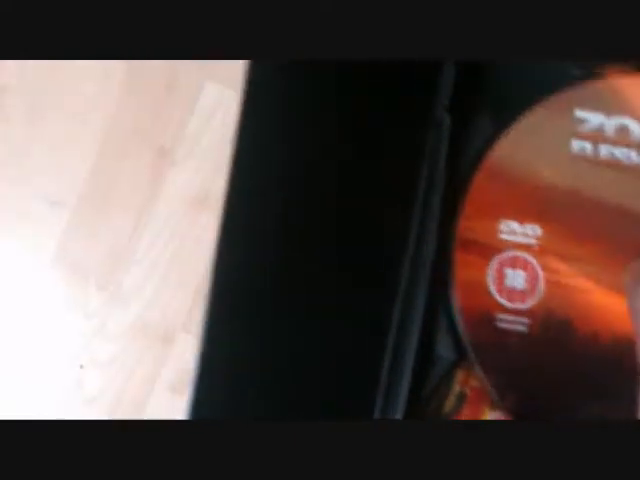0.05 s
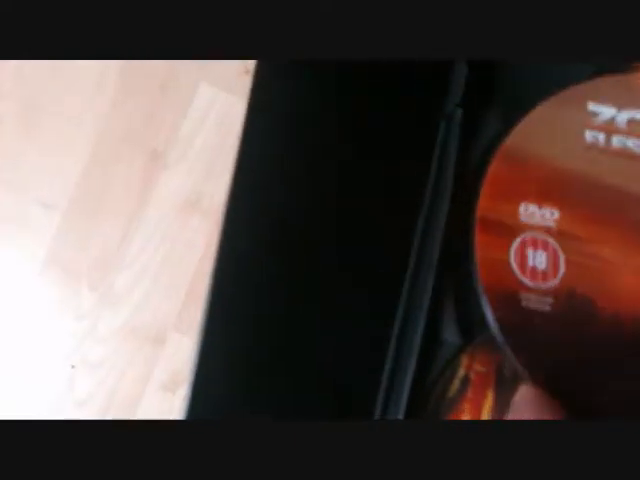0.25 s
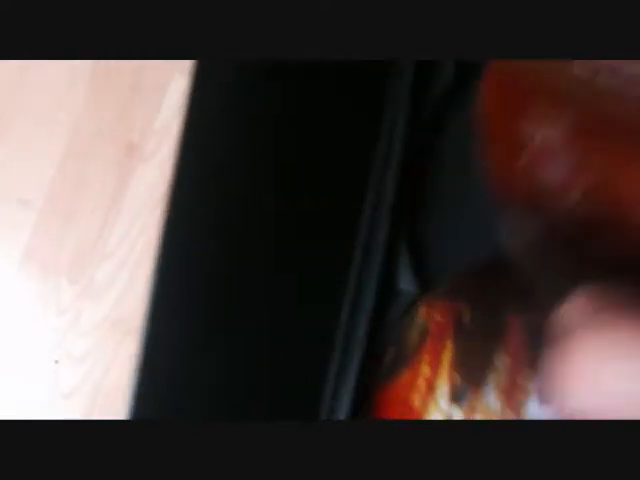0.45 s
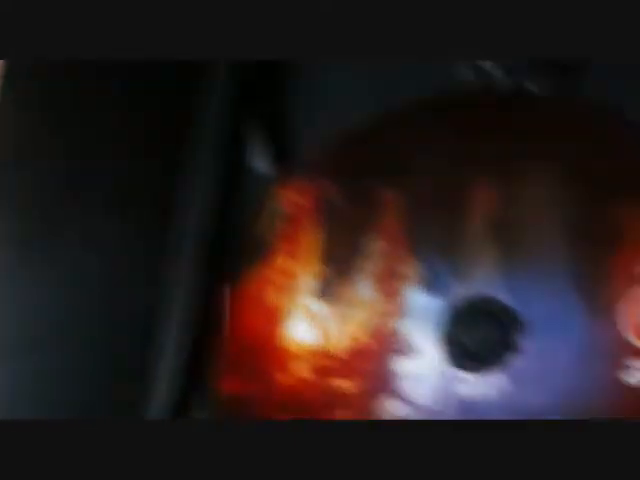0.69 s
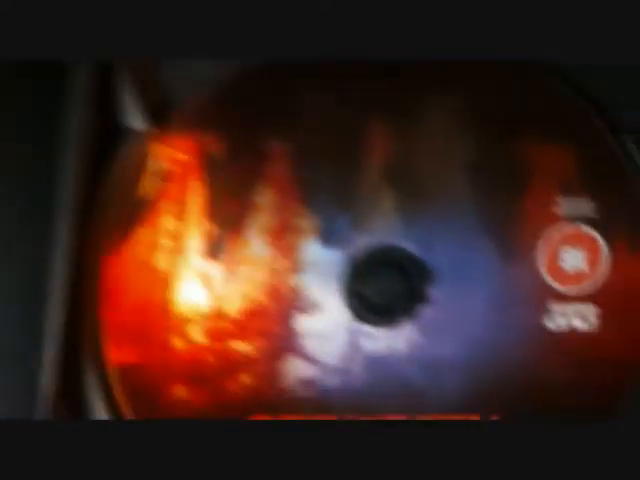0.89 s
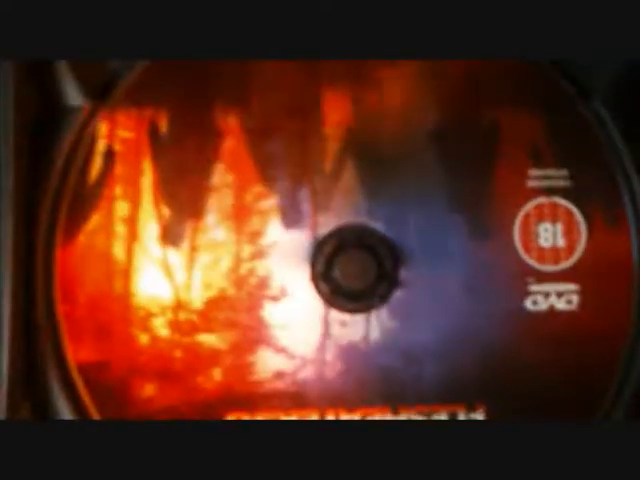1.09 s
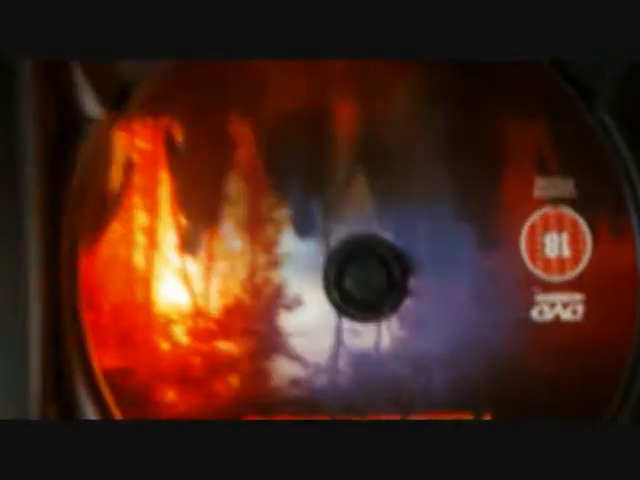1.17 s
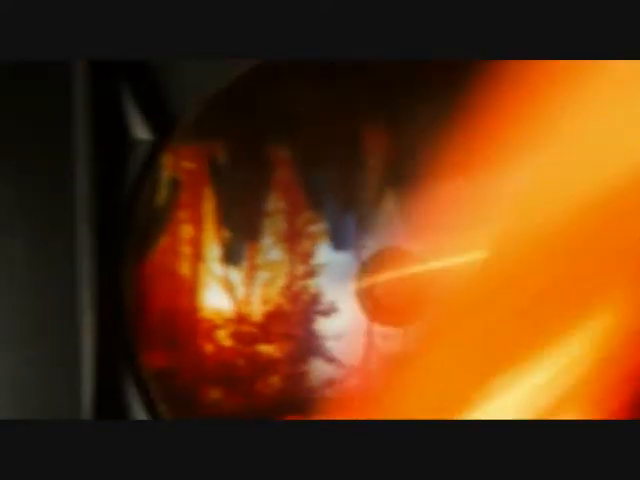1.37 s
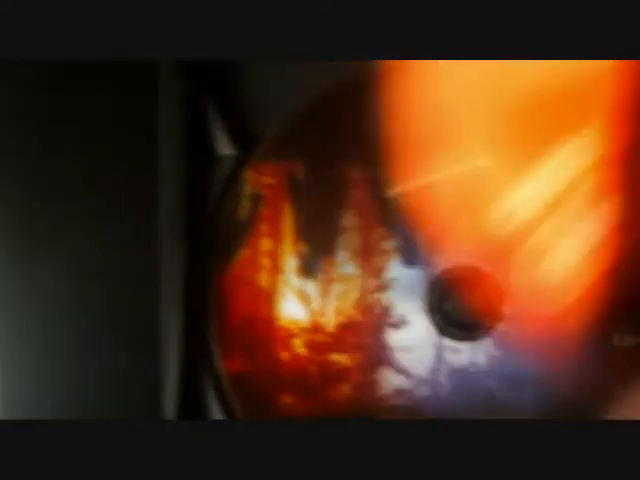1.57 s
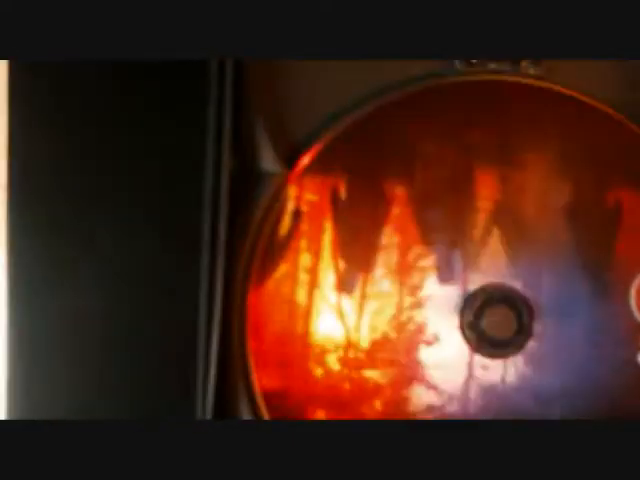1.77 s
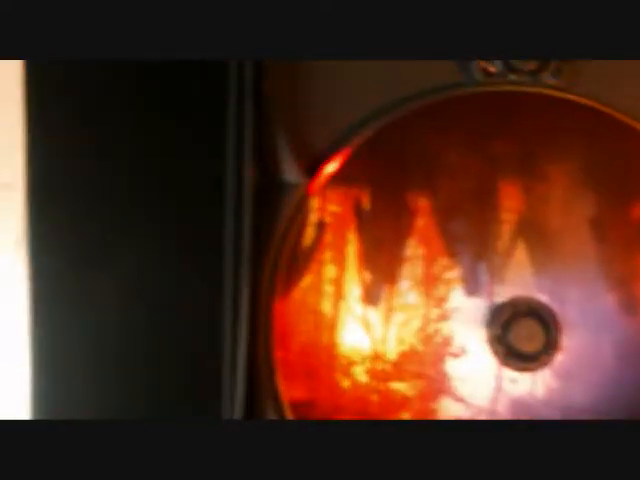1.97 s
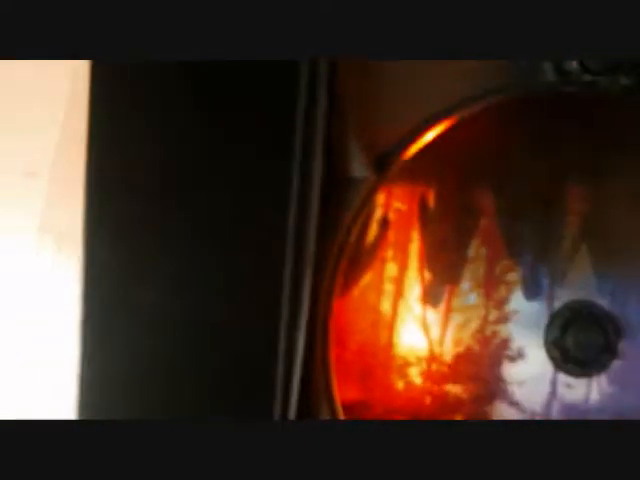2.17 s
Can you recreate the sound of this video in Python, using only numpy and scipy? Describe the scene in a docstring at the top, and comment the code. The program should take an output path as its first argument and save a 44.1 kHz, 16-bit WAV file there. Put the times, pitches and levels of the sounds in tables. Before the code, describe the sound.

A plastic disc snaps off its case hub, then one is pressed on with quick clicks.

```python
"""Discs in a plastic case

Close by in a small quiet room, a disc snaps off its hub in a multi-disc case and the tray claps back.
After some faint sliding, a disc is pressed home in a quick run of snaps. Each snap is a burst of tiny
plastic impacts that sets disc and tray ringing. A coarse recorder cuts off the highest treble and
turns the quiet of the room into a grainy hiss."""
import sys
import numpy as np
from scipy import signal
from scipy.fft import rfft, irfft
from scipy.io import wavfile
from scipy.ndimage import uniform_filter1d, minimum_filter1d

SR = 44100
rng = np.random.default_rng(int(sys.argv[2]) if len(sys.argv) > 2 else 0)


def waveform_to_disk(signal):
    """Save audio, clipped to [-1, 1], as 16-bit WAV at the path in sys.argv[1]."""
    frames = np.transpose(np.atleast_2d(signal))
    scaled = np.clip(frames, -1, 1) * 32767
    samples = np.round(scaled).astype(np.int16)
    wavfile.write(sys.argv[1], SR, samples)


N = 97020
T = np.arange(N) / SR
CUTOFF_HZ = 8800   # top of the recorder's range


def from_db(db):
    """Turn decibels into a volume factor."""
    return 10 ** (np.asarray(db) / 20)


def unit_power(x):
    """Scale a sound to an average power of one."""
    return x / np.sqrt(np.mean(x ** 2) + 1e-20)


def coloured(x, colour, tilt_db=0):
    """Shape a sound's tone with a colour curve, tilted by tilt_db per octave above 1200 Hz."""
    size = 2 * N
    hz = np.maximum(np.arange(N + 1) * SR / size, 1)
    points = np.array(colour)
    curve_db = np.interp(np.log(hz), np.log(points[:, 0]), points[:, 1])
    gain = from_db(curve_db + tilt_db * np.log2(np.clip(hz, 1200, CUTOFF_HZ)))
    gain /= np.sqrt(np.mean(gain[hz < CUTOFF_HZ] ** 2))
    # build the filter so that nothing sounds ahead of a hit
    cepstrum = irfft(np.log(gain))
    cepstrum[1:N] *= 2
    cepstrum[N + 1:] = 0
    return irfft(rfft(x, size) * np.exp(rfft(cepstrum)))[:N]


def grains(per_s, spread_db):
    """Tiny random impacts of uneven size."""
    hits = (rng.random(N) < per_s / SR) * rng.choice([-1, 1], N)
    return unit_power(hits * from_db(spread_db * rng.standard_normal(N)))


def cracks(contacts, colour, fade_s):
    """Plastic chatters on plastic for a moment at each contact, then drops 60 dB in fade_s."""
    out = np.zeros(N)
    for start, db, chatter_s, tilt_db, *_ in contacts:
        shape = (T >= start) * from_db(-60 * np.maximum(T - start - chatter_s, 0) / fade_s)
        burst = shape * grains(per_s=7000, spread_db=4)
        burst *= np.sqrt(np.sum(shape ** 2) / (np.sum(burst ** 2) + 1e-20))
        out += from_db(db) * coloured(burst, colour, np.clip(tilt_db, -5, 5))
    return out


def ringing(snaps, tones, fade_s):
    """Each snap feeds the plastic's own tones. At 2 kHz they drop 60 dB in fade_s, higher ones sooner."""
    out = np.zeros(N)
    for (hz, tone_db), phase in zip(tones, rng.uniform(0, 2 * np.pi, len(tones))):
        kicks = np.zeros(N)
        for start, db, _, _, ring_db in snaps:
            kicks[int(start * SR)] += from_db(db + ring_db + tone_db) ** 2
        tone_fade_s = fade_s * (2000 / hz) ** 0.077
        energy_kept = from_db(-120 / (SR * tone_fade_s))
        energy = signal.lfilter([1], [1, -energy_kept], kicks + 1e-20)
        out += np.sqrt(energy) * np.sin(2 * np.pi * hz * T + phase)
    return out


# tone colour of the quiet room: f/Hz, level/dB
AIR_COLOUR = [(8, 7.5), (28, 19), (60, 16), (150, 12), (400, 9), (1000, 5), (3000, -0.5), (8000, -0.5)]


def room_air():
    """The room's faint, steady noise, strongest in the bass."""
    return from_db(-51) * unit_power(coloured(rng.standard_normal(N), AIR_COLOUR))


# a disc's slides: t/s, level/dB, rise/s, fall/s, centre f/Hz
DISC_SLIDES = [(.115, -44.5, 0.036, 0.043, 2300), (.11, -52, 0.034, 0.055, 5670),
               (0.217, -50, 0.043, 0.044, 2290), (0.844, -45.5, 0.0079, 0.048, 3935),
               (0.942, -57.5, 0.0069, 0.022, 5070), (1.194, -56, 0.011, 0.023, 4160),
               (1.419, -47, .004, 0.0092, 2590)]


def sliding():
    """A disc rubs over plastic: fine grains in one broad band of pitch swell and fade."""
    out = np.zeros(N)
    for peak_time, db, rise, fall, hz in DISC_SLIDES:
        width_hz = 0.31 * hz
        radius = np.exp(-np.pi * width_hz / SR)
        resonance = [1, -2 * radius * np.cos(2 * np.pi * hz / SR), radius ** 2]
        rub = signal.lfilter([1, 0, -1], resonance, grains(per_s=4900, spread_db=4.5))
        swell = np.exp(-np.maximum((peak_time - T) / rise, (T - peak_time) / fall))
        out += from_db(db) * unit_power(rub) * swell
    return out


# light touches: t/s, level/dB, chatter/s, treble tilt/(dB per octave)
EDGE_TOUCHES = [(.232, -45, .002, -4.5), (.574, -45.5, 0.0022, 3), (1.415, -46.5, .004, 0.5),
                (1.8268, -20.5, 0.00094, 0.5), (1.8295, -38.5, 0.0015, -10), (1.837, -38, 0.013, 9),
                (1.8503, -33, 0.0045, -7), (2.195, -29.5, 0.0033, 0)]
# their tone colour: f/Hz, level/dB
EDGE_COLOUR = [(60, -13), (700, -11), (1500, -8.5), (2600, -4), (4500, -2.5), (5800, -4.5), (7000, -0.5),
               (8000, -1)]


def edge_ticks():
    """A disc's edge ticks as it lightly touches the plastic."""
    return cracks(EDGE_TOUCHES, EDGE_COLOUR, fade_s=0.027)


# snaps off the hub: t/s, level/dB, chatter/s, treble tilt/(dB per octave), ring/dB
RELEASE_SNAPS = [(.2422, -22.5, 0.0042, 2, -17), (.2475, -3.5, 0.013, 1, -9), (.2566, -0.5, .004, -1, -1.5),
                 (.2665, -20, 0.0054, 5.5, -11)]
# their tone colour: f/Hz, level/dB
RELEASE_SNAP_COLOUR = [(15, -4.5), (40, 5), (120, -4.5), (260, -1), (520, -4.5), (720, -6.5), (860, -5),
                       (1060, 4), (1300, -9), (1550, -1.5), (2200, 0), (2850, 0), (3500, -2.5),
                       (4300, -2.5), (5050, -7), (5700, 2), (6200, -1), (6700, 1), (8000, -0.5)]
# tones of the freed disc and tray: f/Hz, level/dB
FREE_TONES = [(393, -9), (720, -6), (1020, -2), (1076, 1), (1620, -9), (1946, -4), (2148, -5), (2308, 2),
              (2347, -4), (2810, -4), (3303, -7), (4087, -8), (4222, -8), (4570, -7), (5490, -4),
              (5626, -5), (5781, -2), (6441, -5), (6560, -5), (6628, -2), (6738, -2), (6995, -5),
              (7276, -6)]


def disc_release():
    """The disc springs off its hub. Gives the snaps and the ringing they start."""
    snaps = cracks(RELEASE_SNAPS, RELEASE_SNAP_COLOUR, fade_s=0.03)
    return snaps, ringing(RELEASE_SNAPS, FREE_TONES, fade_s=0.091)


# bends of the case: t/s, level/dB, rise/s
CASE_BENDS = [(0.2484, -13.5, 0.0016), (0.259, -20.5, .012), (1.864, -24, 0.0061)]


def case_bending():
    """The case bends as a disc lets go or is pushed in, drawing a soft puff of air."""
    out = np.zeros(N)
    for start, db, rise in CASE_BENDS:
        age = np.maximum(T - start, 0) / rise
        out -= from_db(db) * age * np.exp(1 - age)
    return out


# hits of the tray: t/s, level/dB, chatter/s, treble tilt/(dB per octave)
TRAY_HITS = [(.3285, -28.5, .004, -3.5), (.3332, -19.5, 0.0035, -3.5), (.3372, -17, 0.0054, 2.5)]
# their tone colour: f/Hz, level/dB
TRAY_COLOUR = [(60, -29.5), (450, -13), (780, -3.5), (1100, -11), (1650, 6.5), (2100, 2.5), (2600, 3.5),
               (3300, -4.5), (4300, -9), (4800, 3), (5300, -8), (6000, -4), (7000, -2.5), (8000, -5)]


def tray_clap():
    """The tray claps back against the case in three quick hits."""
    return cracks(TRAY_HITS, TRAY_COLOUR, fade_s=0.016)


# snaps onto the hub: t/s, level/dB, chatter/s, treble tilt/(dB per octave), ring/dB
PRESS_SNAPS = [(1.8655, -7.5, 0.011, -0.5, -11), (1.8872, -17.5, 0.0031, -4, -1),
               (1.8917, -12.5, 0.014, -0.5, 10), (1.9012, -4.5, 0.0031, -2, -2.5),
               (1.9095, -15.5, 0.0053, 2.5, -3), (1.9147, -10.5, 0.006, -0.5, -9),
               (1.9215, -15, 0.0057, -3.5, 0.5)]
# their tone colour: f/Hz, level/dB
PRESS_SNAP_COLOUR = [(15, -15), (50, -2), (120, -3.5), (400, -7.5), (720, -7.5), (960, 1), (1150, -7),
                     (1380, 2.5), (1700, 0.5), (2000, -3.5), (2400, 0), (2850, -4), (3900, 0.5),
                     (5100, 0.5), (5500, 0), (6800, 4), (7400, 5.5), (8000, 1.5)]
# tones of the tray with a disc in place: f/Hz, level/dB
SEATED_TONES = [(490, -15), (968, -7), (1324, -2), (1450, -4), (1611, -3), (1823, -9), (2222, -6),
                (2381, -8), (2483, -9), (2612, -9), (3305, -7), (4098, -6), (4807, -10), (5107, -8),
                (5824, -6), (5993, -7), (6225, -6), (6646, -3), (6741, 0), (6825, -7), (6940, -7),
                (7325, -6)]


def disc_press():
    """A disc is pushed over the hub's teeth. Gives the snaps and the ringing they start."""
    snaps = cracks(PRESS_SNAPS, PRESS_SNAP_COLOUR, fade_s=0.051)
    return snaps, ringing(PRESS_SNAPS, SEATED_TONES, fade_s=0.1)


# the room's echo: f/Hz, level/dB, time to drop 60 dB/s
ROOM_ECHO = [(100, -14, 0.29), (426, -7.5, 0.21), (1200, -12, 0.23), (3000, -5, .15), (7340, -7, 0.16)]


def room_echo(x):
    """Many reflections build up and die away, each octave at its own pace."""
    t, table = T[:SR // 2], np.array(ROOM_ECHO)
    edges_hz, build_s = np.geomspace(35, 9000, 9), 0.0036
    echo = np.zeros(len(t))
    for low, high in zip(edges_hz, edges_hz[1:]):
        log_centre = np.log(low * high) / 2
        db, fade_s = (np.interp(log_centre, np.log(table[:, 0]), table[:, k]) for k in (1, 2))
        octave = signal.butter(2, [low, high], "band", fs=SR, output="sos")
        noise = signal.sosfilt(octave, rng.standard_normal(len(t)))
        tail = noise * from_db(-60 * t / fade_s) * (1 - np.exp(-t / build_s))
        echo += from_db(db) * tail * np.sqrt(2 * (high - low) / SR / np.sum(tail ** 2))
    return signal.fftconvolve(x, echo)[:N]


def scene():
    """Mix the snaps, their ringing and the small handling sounds in the room."""
    release, free_ring = disc_release()
    press, seated_ring = disc_press()
    rings = from_db(-14) * (free_ring + seated_ring)
    handling = sliding() + edge_ticks() + tray_clap()
    echo = room_echo(release + from_db(-8.5) * press + from_db(-12) * handling)
    return (room_air() + release + press + rings + handling + case_bending() + echo)[None]


def record(dry):
    """The recorder rounds off peaks, stores the sound in coarse steps, smooths it and limits its level."""
    overload, step, ceiling = 1.1, 1 / 128, 0.97   # 1 is full volume
    rate_hz, limiter_s = 16000, 0.0015
    rounded = overload * np.tanh(dry / overload)
    sampled = signal.resample_poly(rounded, rate_hz, SR, axis=1, window=("kaiser", 3))
    stepped = step * (np.floor(sampled / step) + 0.5)   # this makes the grainy hiss
    smoothing = signal.firwin(121, cutoff=7750, window=("kaiser", 5), fs=SR)
    smooth = signal.fftconvolve(signal.resample(stepped, N, axis=1), smoothing[None], "same")
    # turn the volume down briefly around any peak above the ceiling
    span = int(limiter_s * SR)
    gain = minimum_filter1d(ceiling / np.maximum(np.abs(smooth), ceiling), 2 * span + 1)
    limited = smooth * uniform_filter1d(uniform_filter1d(gain, span), span)
    treble_cut = signal.cheby2(14, 30, CUTOFF_HZ, fs=SR, output="sos")
    return signal.sosfiltfilt(treble_cut, limited)


dry = scene()
out = record(dry)
waveform_to_disk(out)
```